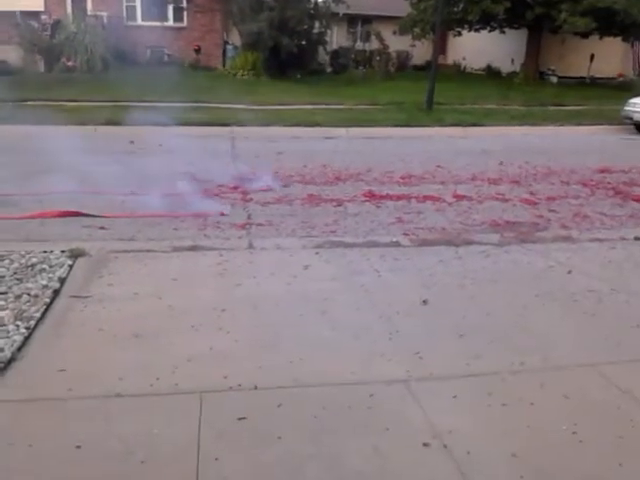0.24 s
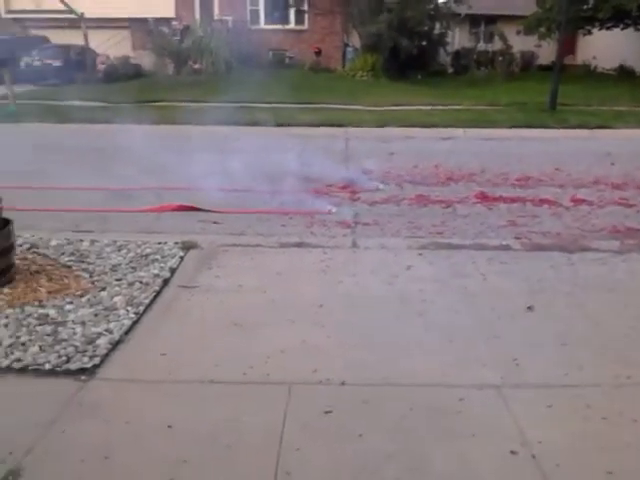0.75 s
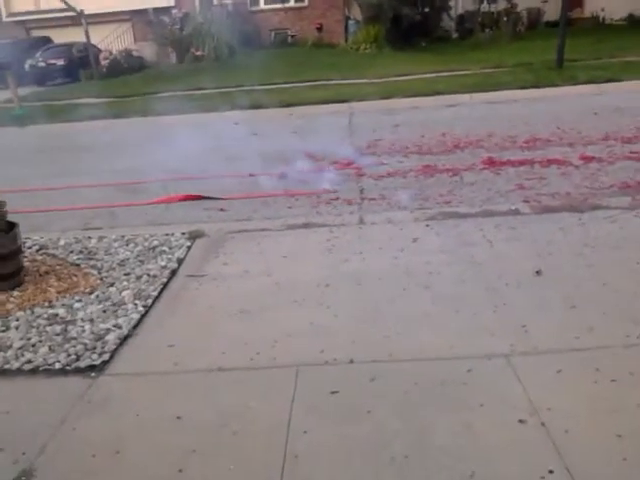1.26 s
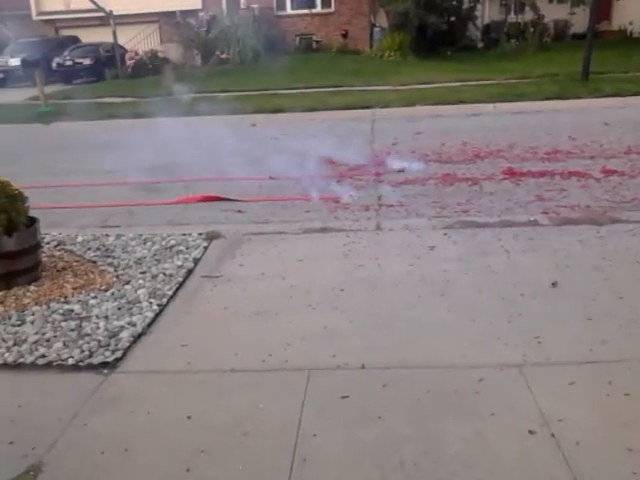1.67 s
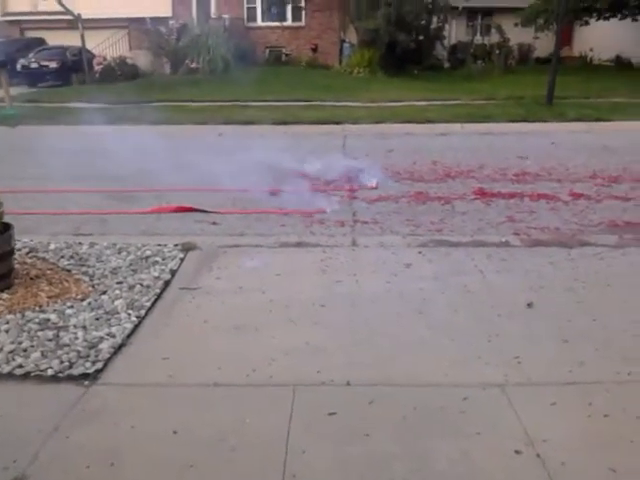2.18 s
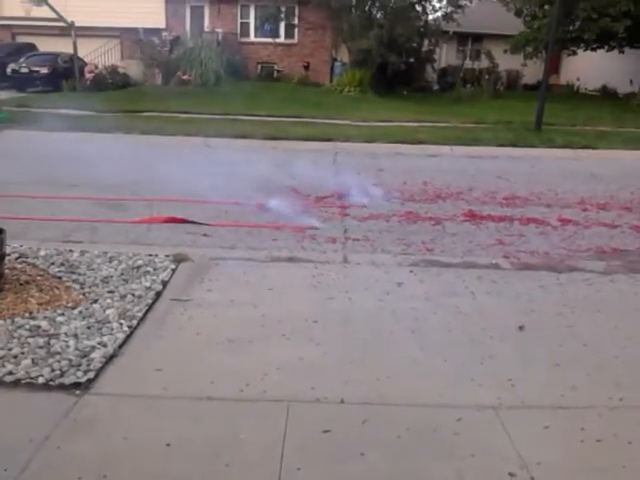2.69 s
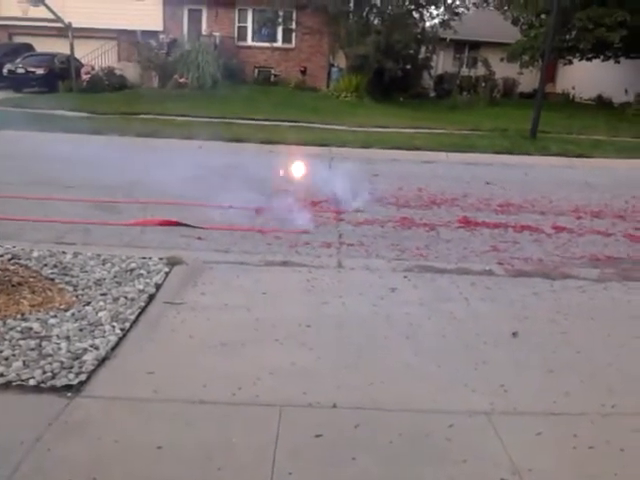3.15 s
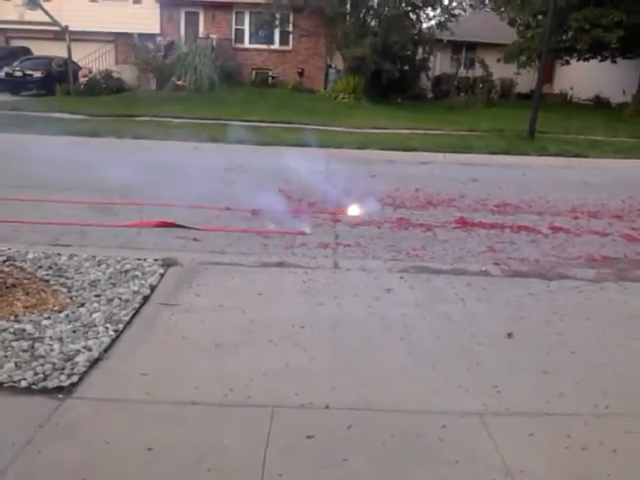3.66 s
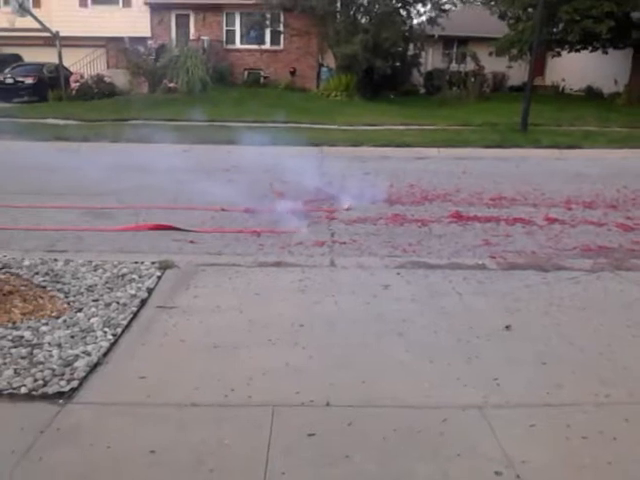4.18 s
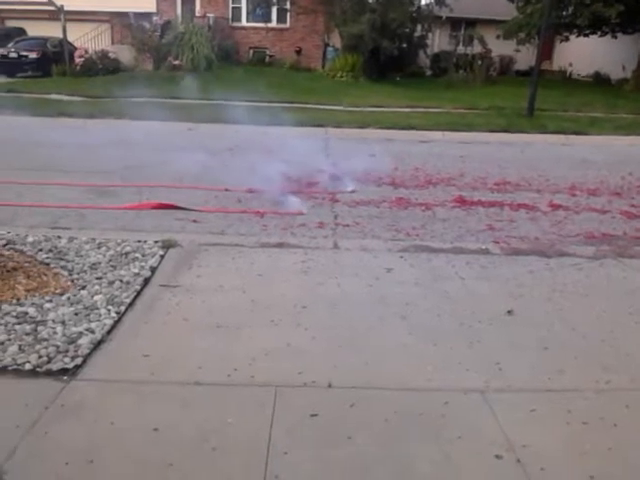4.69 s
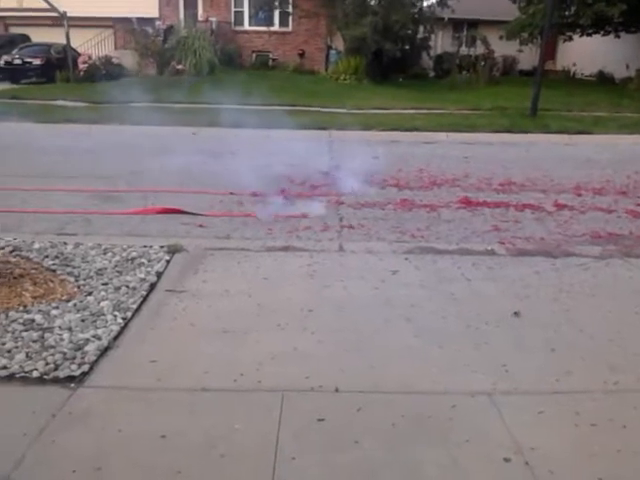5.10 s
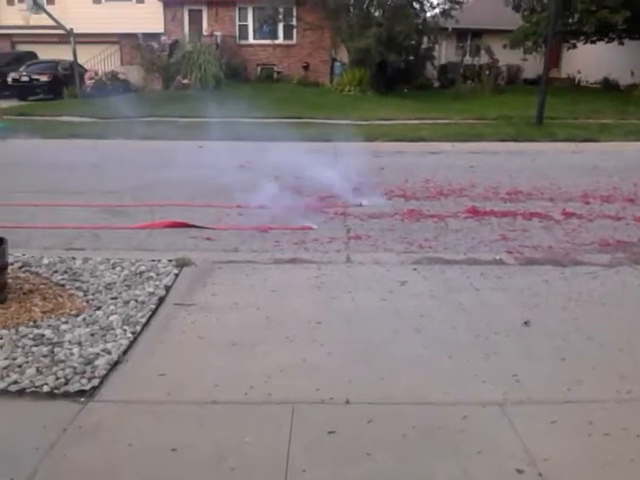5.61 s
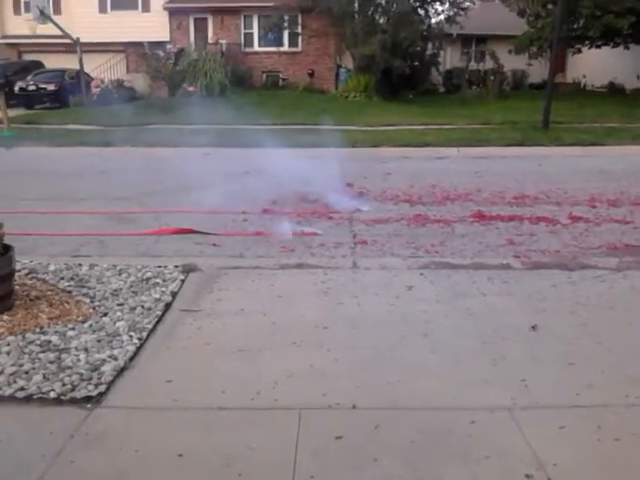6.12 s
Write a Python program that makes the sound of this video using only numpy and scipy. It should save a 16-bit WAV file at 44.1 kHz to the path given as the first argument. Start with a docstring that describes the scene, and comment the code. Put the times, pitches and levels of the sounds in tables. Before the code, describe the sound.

Volley after volley of firecrackers bursts outdoors, making a dense, irregular rattle that lasts the whole time. Louder single cracks and short hollow knocks poke through a bed of sputtering pops, and a light echo comes back from across the street. The small, dull-sounding microphone stands several metres away and briefly overloads on the hardest bangs, about two seconds in and again near the end.

```python
"""A suburban street, a small camera some metres from a long string of burning firecrackers.
From the start the fuse sets off volley after volley of sub-millisecond blasts, stray crackers sputter
between, and the houses opposite throw back a thin echo. Single cracks, thuds and pings soon stand out.
The narrow-band microphone overloads on the biggest cracks, hardest near 1.9 s and 5.5 s,
and the string is still going at six seconds."""
import sys
import numpy as np
from scipy import signal
from scipy.fft import rfft, irfft
from scipy.io import wavfile

SR = 44100
rng = np.random.default_rng(int(sys.argv[2]) if len(sys.argv) > 2 else 0)


def inscribe(sig):
    """Save sig as 16-bit PCM at rate SR to the path in sys.argv[1].

    A 1-D sig is mono; a 2-D sig holds one channel per row.
    Samples are clipped to [-1, 1] before scaling.
    """
    pcm = np.round(np.clip(np.atleast_2d(sig).T, -1, 1) * 32767)
    wavfile.write(sys.argv[1], SR, pcm.astype(np.int16))


N = 279946

# volleys along the fuse: t/s, length/s, relative level/dB, thump/dB
FUSE_VOLLEYS = [(0,0.052,-22,-3.5),(0.048,0.044,-16,-2),(0.146,0.031,-19.5,1),(.185,0.033,-18,-2.5),(0.254,0.1,-15.5,-5),(0.477,0.028,-16.5,1.5),(0.505,0.066,-18,-0.5),(.621,.026,-13.5,3),(.665,0.074,-19,-5),(0.79,0.066,-22,-3.5),(0.977,0.046,-19.5,5),(1.016,0.043,-19.5,2.5),(1.067,0.025,-17,3),(1.149,0.079,-18,3),(1.232,0.053,-21.5,2),(1.297,0.066,-21.5,-13),(1.479,0.044,-23.5,-1.5),(1.552,0.031,-20,-3),(1.593,0.1,-21,-4.5),(1.735,0.1,-22,5),(1.81,0.078,-16,1),(1.923,0.035,-19,-8.5),(2.038,.022,-21,-0.5),(2.069,0.028,-15.5,-2.5),(2.129,0.024,-19.5,-12),(2.283,0.04,-15,0.5),(2.334,0.027,-15.5,-15),(2.471,0.062,-15,0),(2.567,0.027,-22,-3.5),(2.622,0.013,-19.5,-8),(2.723,0.04,-19.5,3),(2.769,0.031,-15.5,-2),(2.857,0.057,-20.5,1),(2.913,0.087,-16.5,1),(3.05,0.034,-21.5,3),(3.084,0.027,-22,8),(3.114,0.062,-22.5,2),(3.211,.038,-17,-0.5),(3.274,.042,-11.5,-2.5),(3.384,0.042,-20.5,4.5),(3.424,0.032,-13,0),(3.489,0.054,-17.5,-1.5),(3.554,0.088,-16,0),(3.659,0.025,-15,-0.5),(3.741,0.082,-17.5,2.5),(3.823,0.12,-15,-4),(3.921,0.024,-21,6.5),(3.958,0.093,-24,-1),(4.122,0.042,-23,5.5),(4.187,0.031,-27,7),(4.235,0.045,-15.5,-4),(4.381,0.063,-19,0),(4.465,.06,-23.5,-13),(4.573,0.024,-19.5,1.5),(4.604,0.037,-20.5,0),(4.672,0.042,-25,-6.5),(4.808,0.082,-18,1),(4.905,0.02,-21.5,-8),(5.008,0.12,-18,1),(5.111,0.096,-18.5,4.5),(5.199,0.068,-15.5,-2),(5.389,0.068,-22,5),(5.43,0.046,-12,1),(5.543,0.023,-18.5,2),(5.583,0.091,-22.5,0.5),(5.654,0.084,-20.5,-5),(5.858,0.047,-22,2),(5.93,.022,-17.5,-6),(5.969,0.024,-19.5,-3),(6.007,0.091,-20.5,-1.5),(6.222,0.065,-17,-1.5)]
# an average blast at the microphone: f/Hz, relative level/dB
BLAST_SPECTRUM = [(18, -48.5), (30, -22), (96, -14), (208, -11), (266, -11), (384, -8), (443, -10),
                  (578, -4), (653, -7), (753, -5.5), (1450, -5.5), (2180, 1), (2410, 0), (3200, -11.5),
                  (3930, -27.5), (5110, -80.5), (8650, -120)]
# where a fuller charge gains body: f/Hz, share/1
BODY_SHARE = [(220, 0.33), (420, 1), (620, 0.85), (1000, 0.9), (1900, 0)]
# where it gains thump, and with it a harder edge: f/Hz, share/1
THUMP_SHARE = [(220, 1), (420, 0.28), (2800, 0.034), (3900, 0.98)]
# moments when the stray crackers falter: t/s
STRAY_PAUSES = [.89, 1.43, 2.24, 2.68, 3.71, 4.35, 4.964]
# echoes from the house fronts: delay/s, relative level/dB
HOUSE_ECHOES = [(0.065, -13), (.12, -14), (.192, -15.5), (.315, -22.5), (0.489, -24)]
# lawns swallow both ends of the echo's spectrum: f/Hz, gain/dB
LAWN_RESPONSE = [(100, -10), (400, -10), (900, 1), (1700, 3.5), (3100, 1), (4000, -11)]
# single crackers that stand out: t/s, peak ahead of the microphone/dB
BIG_CRACKS = [(0.068, -2.5), (0.2893, -3.5), (0.4896, -3), (0.6273, -2), (0.6352, -1.5), (0.6422, -1.4),
              (0.866, -9), (0.9833, -3.5), (1.032, -1.1), (1.0704, -1.0), (1.1498, -4), (1.472, -20.5),
              (1.5603, -6.5), (1.7364, -7), (1.8051, -1.7), (1.837, -2), (1.8457, -0.5), (1.8559, -5),
              (1.867, -0.7), (1.8713, 1.7), (1.885, -2.0), (2.048, -4.5), (2.0654, -3.5), (2.2852, -3.5),
              (2.3041, -2.5), (2.476, -2.5), (2.5213, 0.2), (2.5288, -2), (2.7315, -2.5), (2.9474, -1.5),
              (3.0764, -2.4), (3.1336, -5.5), (3.2109, -9.5), (3.274, -3.5), (3.2982, -1.5), (3.4374, -0.9),
              (3.489, -6), (3.5876, -1.5), (3.785, -0.9), (3.8499, -3.5), (3.881, -2.5), (3.9009, -2.5),
              (3.9888, -3), (4.253, -3), (4.513, -6), (4.5785, -2.14), (4.671, -10), (4.8113, -5),
              (4.8667, -3.5), (4.914, -3.5), (4.9895, -16), (5.1521, -3.5), (5.217, -2), (5.397, -7.5),
              (5.427, -1), (5.4492, -1.7), (5.4582, 1.8), (5.461, -1.5), (5.4721, -1.5), (5.932, -6),
              (6.1204, -8), (6.2476, -3.5)]
# thuds, hollow knocks and pings within the rattle: t/s, f/Hz, relative peak/dB
RATTLE_KNOCKS = [(.19, 557, -17.5), (0.484, 190, -20), (1.026, 128, -19.5), (1.026, 993, -14),
                 (1.062, 2383, -16), (1.068, 546, -11), (1.16, 115, -23.5), (1.234, 108, -22),
                 (1.74, 79, -23), (1.789, 90, -20), (1.864, 735, -11), (1.864, 2437, -6.5),
                 (2.046, 110, -23), (2.329, 534, -17), (2.335, 2207, -14.5), (2.725, 111, -18),
                 (2.748, 2260, -10), (3.065, 2106, -9.5), (3.09, 458, -15), (3.129, 2146, -10),
                 (3.43, 2050, -12), (3.57, 110, -25), (3.74, 95, -22.5), (3.931, 695, -9.5),
                 (4.575, 130, -25.5), (4.809, 748, -14.5), (5.204, 625, -15), (5.43, 584, -10.5)]

BAND_HZ = 4450  # top of the microphone's band


def gain_of(db):
    """Decibels to amplitude."""
    return 10 ** (np.asarray(db) / 20)


def curve_at(points, hz):
    """Interpolates a table of f/Hz, value on a log-frequency axis."""
    f, value = np.transpose(points)
    return np.interp(np.log(hz + 1), np.log(f + 1), value)


def add(mix, start_s, sound):
    """Lays a sound into the mix, no earlier than time zero."""
    part = mix[max(round(start_s * SR), 0):][:len(sound)]
    part += sound[:len(part)]


def lowpass(x, hz):
    """Steep low-pass without delay."""
    return signal.oaconvolve(x, signal.firwin(255, hz, window=("kaiser", 9), fs=SR), "same")


def minimum_phase(gain):
    """The sharpest-starting impulse response that has this magnitude spectrum."""
    log_gain = np.log(np.maximum(np.r_[gain, gain[-2:0:-1]], 1e-5))
    spectrum = np.exp(np.conj(signal.hilbert(log_gain)))
    return np.fft.ifft(spectrum).real[:len(gain)]


def blast(thump_db):
    """One cracker's pressure pulse; a fuller charge has more thump and more body around 600 Hz."""
    hz = np.fft.rfftfreq(4096, 1 / SR)
    average = gain_of(curve_at(BLAST_SPECTRUM, hz))
    body_db = 1.78 + 0.8 * thump_db
    fullness = gain_of(body_db * curve_at(BODY_SHARE, hz) + thump_db * curve_at(THUMP_SHARE, hz))
    return minimum_phase(average / np.sqrt(np.mean(average ** 2)) * fullness)


def firing(per_s, spread_db, scatter_db, size):
    """Crackers of uneven strength at uneven intervals, with fine scatter from the pavement."""
    gaps = rng.gamma(2, .5, size)
    strengths = gain_of(spread_db * np.clip(rng.standard_normal(size), -2, 2))
    strengths *= rng.choice([-1, 1], size)
    at = (np.cumsum(gaps) * SR / per_s).astype(int)
    shots = np.bincount(at[at < size], strengths[at < size], size)
    return shots / shots.std() + gain_of(scatter_db) * rng.standard_normal(size)


def ring(x, patchy_db, neighbours=18):
    """Neighbouring crackers firing within milliseconds reinforce some pitches and cancel others."""
    lags_s = rng.uniform(.0004, .0035, neighbours)
    combs = np.cos(2 * np.pi * np.outer(lags_s, np.fft.rfftfreq(2048, 1 / SR)))
    patches_db = patchy_db * np.sqrt(2 / neighbours) * rng.choice([-1, 1], neighbours) @ combs
    return signal.fftconvolve(x, minimum_phase(gain_of(patches_db)))[:len(x)]


def evened(x):
    """Unit energy, with the same mean spectral density in each of six bands."""
    edges = np.searchsorted(np.fft.rfftfreq(len(x), 1 / SR), [130, 330, 1300, 3000, BAND_HZ])
    bands = np.split(rfft(x), edges)
    return irfft(np.concatenate([band / np.sqrt(np.mean(abs(band) ** 2)) for band in bands]))


def volleys(rise_s=.002, fall_s=0.0035, arch_db=3, thinning_db=1, trim_db=0.33, size=8000):
    """Runs of blasts some metres off: each opens full, swells and ends thin, its ring shifting."""
    out, lead_s = np.zeros(N), 4 * rise_s
    t = np.arange(size) / SR - lead_s
    for start_s, length_s, db, thump_db in FUSE_VOLLEYS:
        opening = (1 + np.tanh(t / rise_s / 2)) / 2
        closing = (1 + np.tanh((length_s - t) / fall_s / 2)) / 2
        power = opening * closing
        burnt = np.clip(t / length_s, 0, 1)
        swell = power * gain_of(arch_db * np.sin(np.pi * burnt)) ** 2
        swell *= power.sum() / swell.sum()
        for stage in (-1, 0, 1):  # crossfaded start, middle, end
            share = swell * np.maximum(1 - abs(2 * burnt - 1 - stage), 0)
            train = firing(per_s=420, spread_db=3.5, scatter_db=-9.5, size=size)
            run = evened(ring(train * np.sqrt(share), patchy_db=4))
            sound = signal.fftconvolve(run, blast(thump_db - stage * thinning_db))
            add(out, start_s - lead_s, gain_of(db + trim_db) * np.sqrt(share.sum()) * sound)
    return out


def strays(level_db=-32, sputter_db=4, clump_s=.03, pause_s=.03, rings=14):
    """Small crackers sputter on under and between the volleys, the ring changing from clump to clump."""
    t = np.arange(N) / SR
    knots = np.arange(0, N / SR + clump_s, clump_s)
    train = firing(per_s=200, spread_db=4, scatter_db=-3.5, size=N)
    sputter = np.interp(t, knots, rng.standard_normal(N)[:len(knots)])
    train *= gain_of(sputter_db * sputter)
    for middle_s in STRAY_PAUSES:
        train *= 1 - np.exp(-((t - middle_s) / pause_s) ** 2)
    clump = (t // clump_s) % rings
    ringing = sum(ring(train * (clump == k), patchy_db=4.5) for k in range(rings))
    sound = signal.oaconvolve(ringing, blast(thump_db=0.5))[:N]
    return gain_of(level_db) * sound / sound.std()


def street_echo(x, t60_s=0.14, wash_db=-22, onset_s=0.032, smear_s=0.002, places=16):
    """House fronts across the street return smeared echoes over a wash from trees and farther walls."""
    t = np.arange(SR) / SR
    wash = gain_of(wash_db - 60 * t / t60_s) * (t > onset_s)
    power = wash ** 2 * np.log(1e6) / (t60_s * SR)
    for delay_s, db in HOUSE_ECHOES:
        power += gain_of(db) ** 2 * np.exp(-abs(t - delay_s) / smear_s) / (2 * smear_s * SR)
    # the string jumps about as it burns, so each volley finds other paths
    starts = np.sort(np.transpose(FUSE_VOLLEYS)[0])
    place = np.searchsorted(starts, np.arange(N) / SR) % places
    echo = np.zeros(N)
    for k in range(places):
        sparse_taps = rng.choice([-1., 1.], SR) * (rng.random(SR) < 1 / 20)
        echo += signal.fftconvolve(x * (place == k), sparse_taps * np.sqrt(20 * power))[:N]
    lawn = gain_of(curve_at(LAWN_RESPONSE, np.fft.rfftfreq(1024, 1 / SR)))
    return signal.oaconvolve(echo, minimum_phase(lawn))[:N]


def cracks(extra_thump_db=1, lone_thump_db=-14.5, near_s=.01):
    """Big single crackers: a little fuller than the volley around them, thin when they go off alone."""
    out = np.zeros(N)
    starts, lengths, _, thumps = np.transpose(FUSE_VOLLEYS)
    for start_s, db in BIG_CRACKS:
        apart_s = np.maximum(starts - start_s, start_s - starts - lengths)
        thump_db = thumps[apart_s.argmin()] + extra_thump_db if apart_s.min() < near_s else lone_thump_db
        pulse = lowpass(ring(blast(thump_db), patchy_db=3), BAND_HZ)
        add(out, start_s, gain_of(db) * pulse / abs(pulse).max())
    return out


def duck_under_cracks(lead_s=0.00048):
    """Gain for the small crackers: they give way for the instant of each big one."""
    dips = np.zeros(N)
    for start_s, _ in BIG_CRACKS:
        add(dips, start_s - lead_s, signal.windows.tukey(80, .5))
    return 1 - np.minimum(dips, 1)


def knocks(trim_db=-1, swell_s=0.0048, wander_rad=0.0028, size=2200):
    """Pitched thuds and pings in the rattle that swell and die within a few hundredths of a second."""
    out, t = np.zeros(N), np.arange(size) / SR
    envelope = t / swell_s * np.exp(1 - t / swell_s)
    for start_s, hz, db in RATTLE_KNOCKS:
        phase = 2 * np.pi * (hz * t + rng.random())
        phase += wander_rad * np.cumsum(rng.standard_normal(size))
        add(out, start_s, gain_of(db + trim_db) * envelope * np.sin(phase))
    return out


def scene(ceiling=0.61):
    """String and echo from where the camera stands; the rattle is rounded off below the biggest cracks."""
    small = volleys() + strays() + knocks()
    big = cracks()
    rattle = small * duck_under_cracks() + street_echo(small + big)
    rounded = rattle / (1 + (rattle / ceiling) ** 4) ** (1 / 4)
    return (rounded + big)[None]


def record(dry, low_hz=38, overload=0.72, spit_top_hz=15900):
    """The camera's narrow-band mono microphone; the biggest peaks clip and spit treble."""
    low_cut = signal.butter(2, low_hz, "high", fs=SR, output="sos")
    narrow = signal.sosfilt(low_cut, lowpass(dry[0], BAND_HZ))
    clipped = np.clip(narrow, -overload, overload)
    return lowpass(clipped, spit_top_hz)[None]


dry = scene()
out = record(dry)
inscribe(out)
```